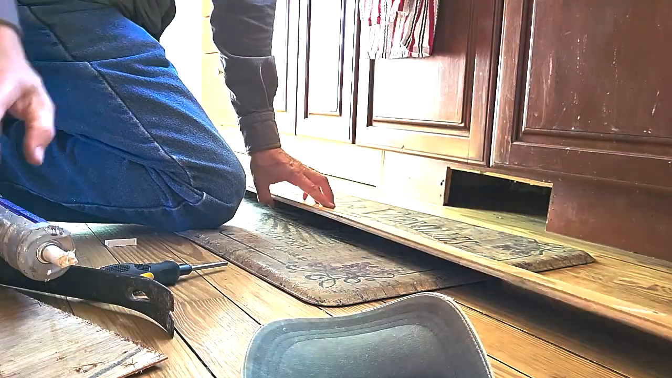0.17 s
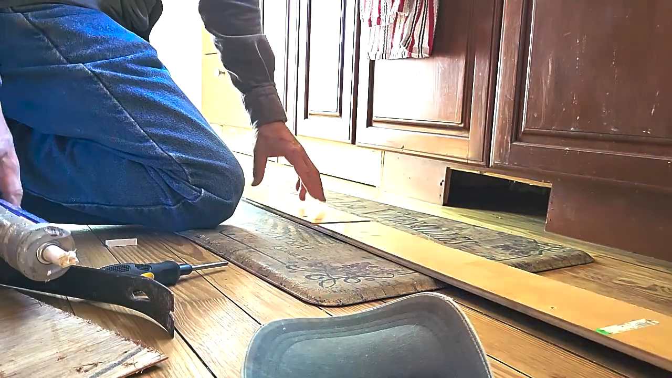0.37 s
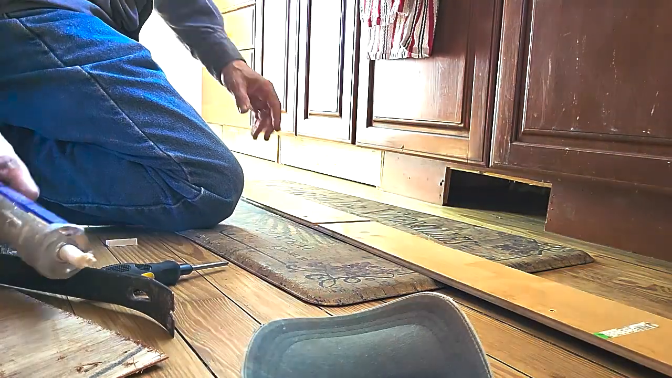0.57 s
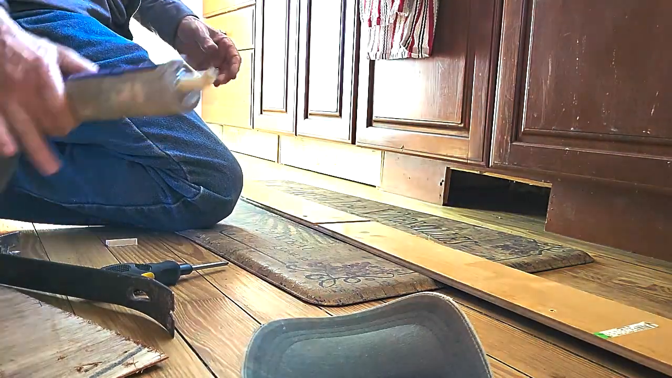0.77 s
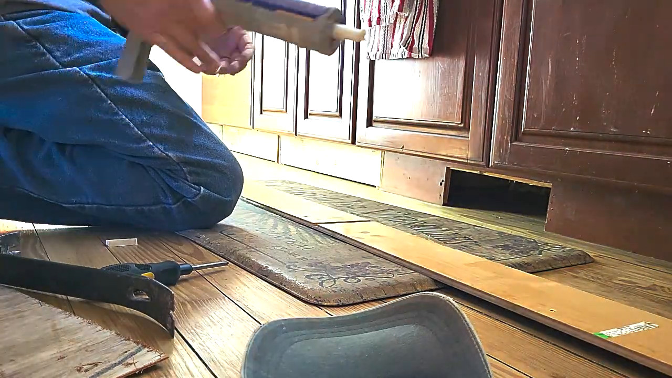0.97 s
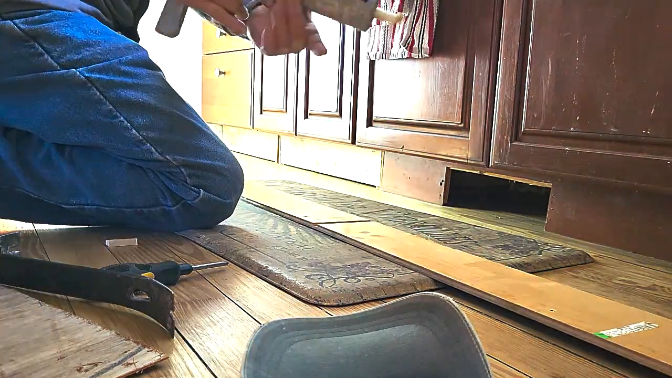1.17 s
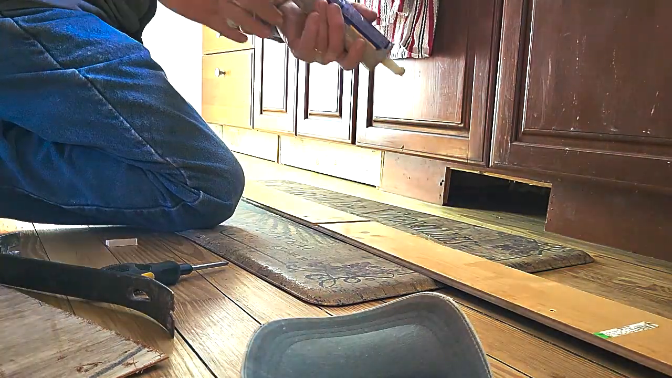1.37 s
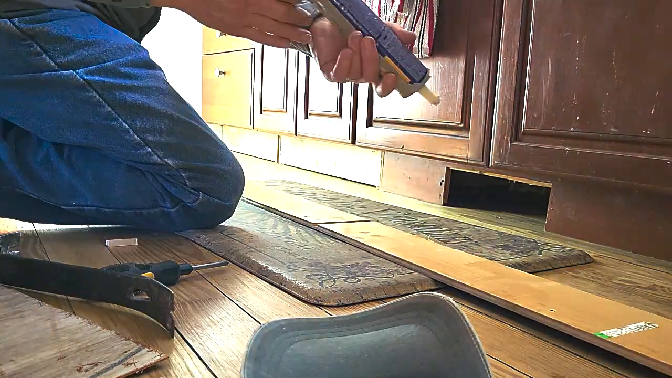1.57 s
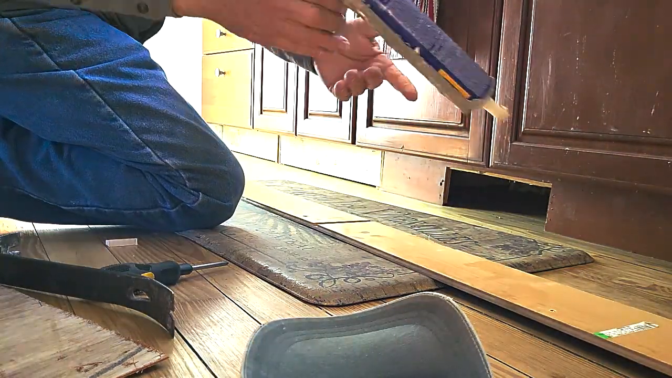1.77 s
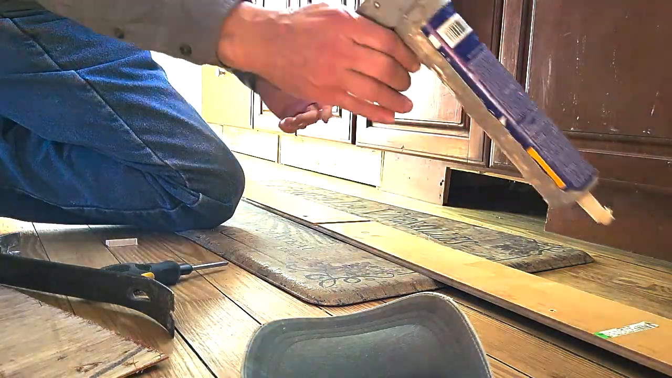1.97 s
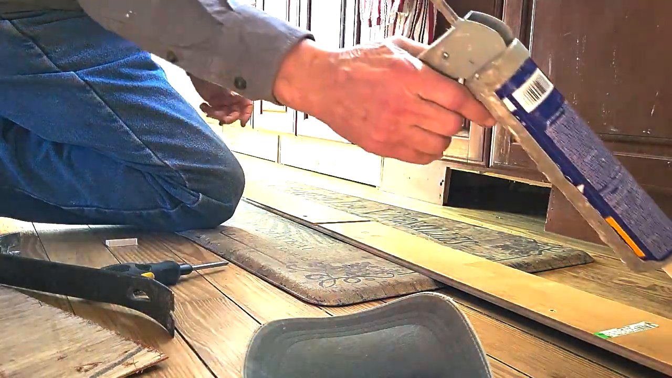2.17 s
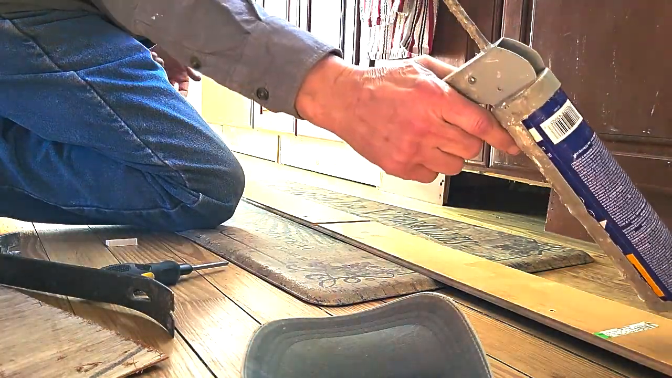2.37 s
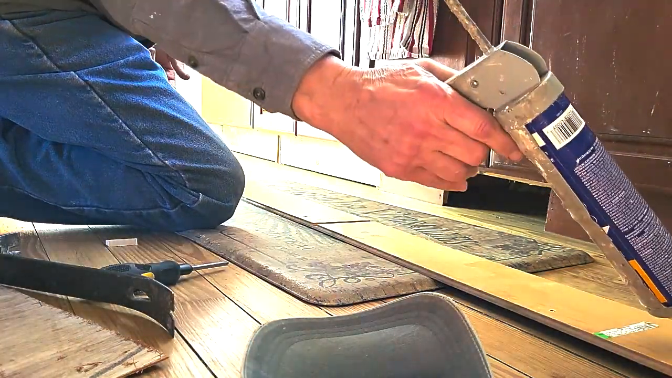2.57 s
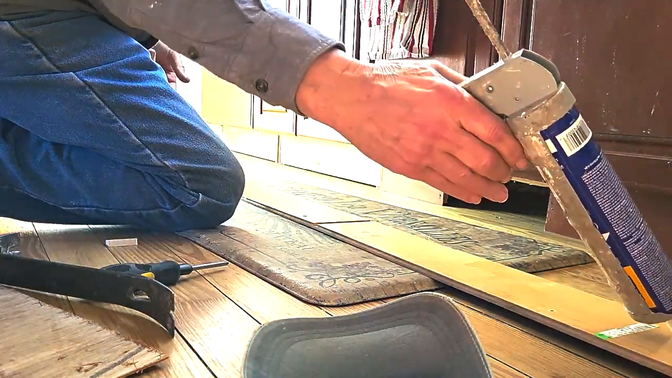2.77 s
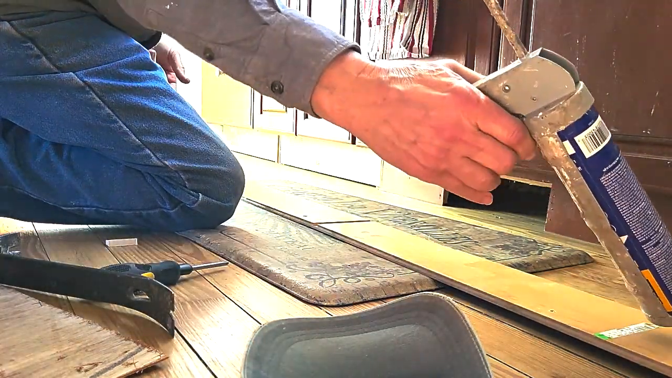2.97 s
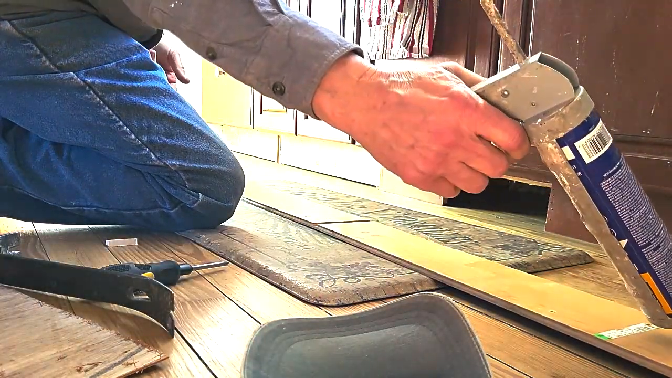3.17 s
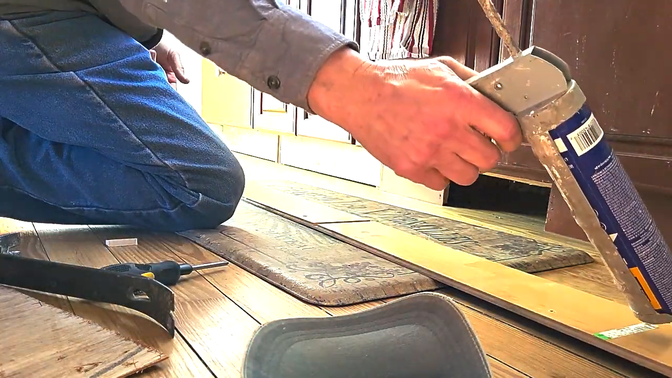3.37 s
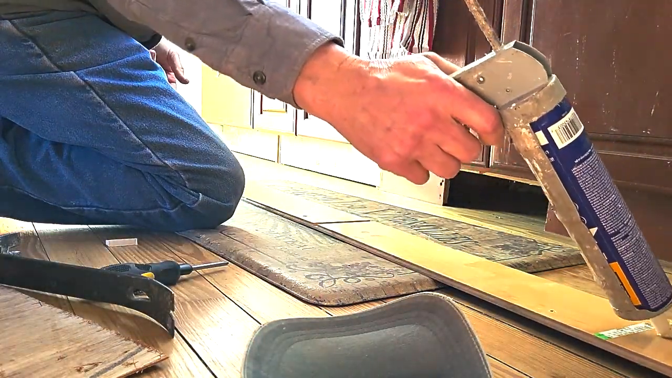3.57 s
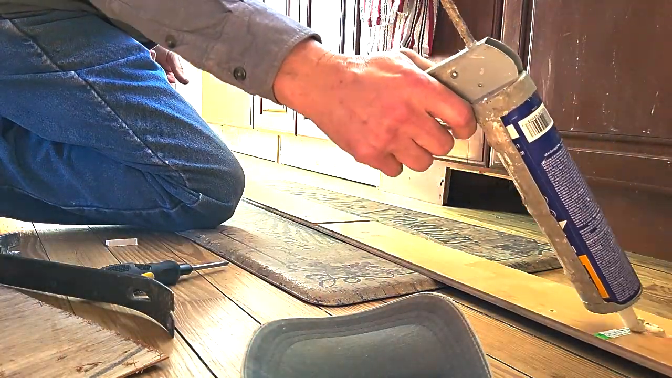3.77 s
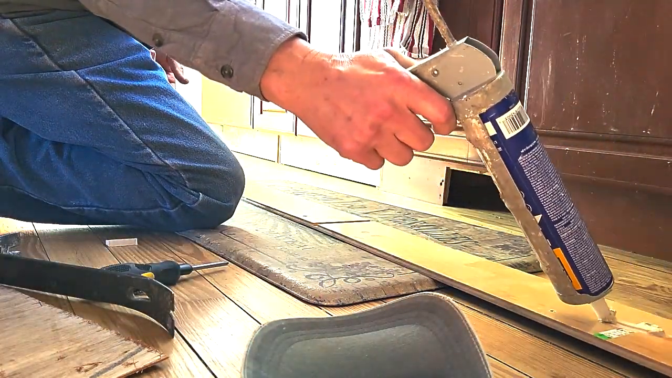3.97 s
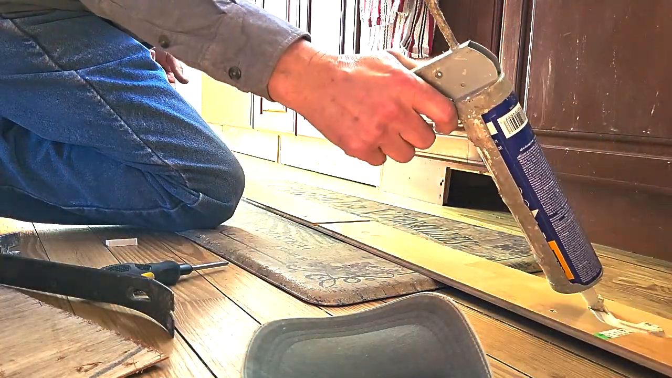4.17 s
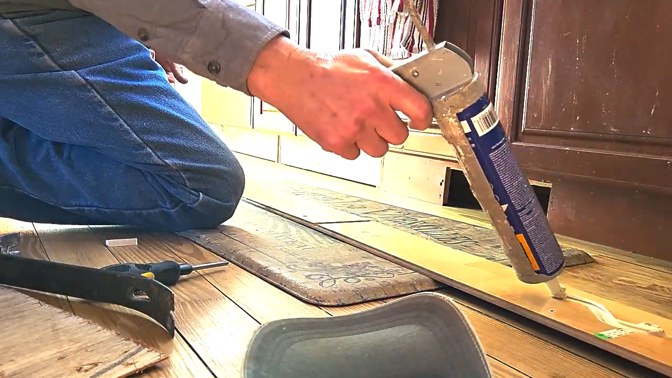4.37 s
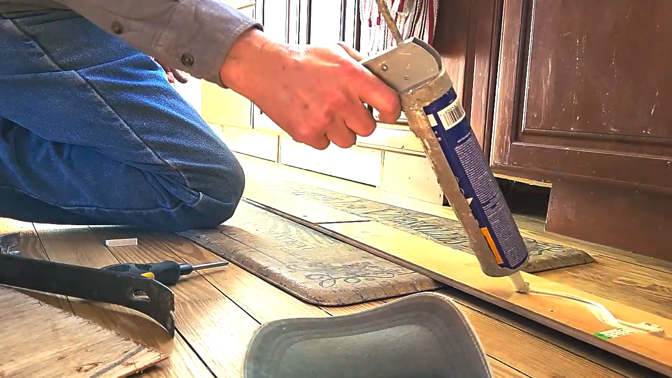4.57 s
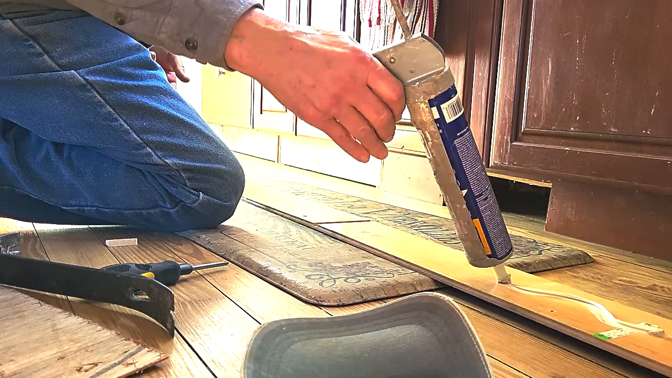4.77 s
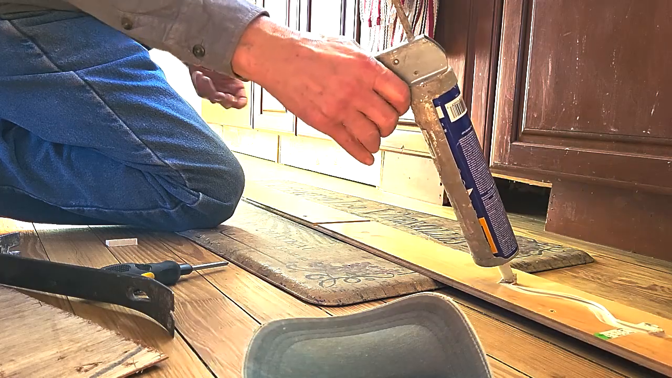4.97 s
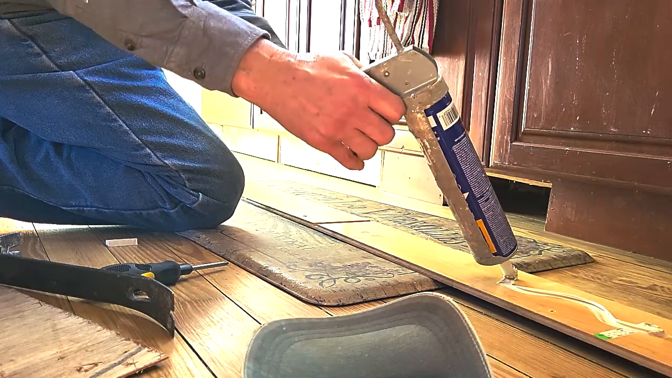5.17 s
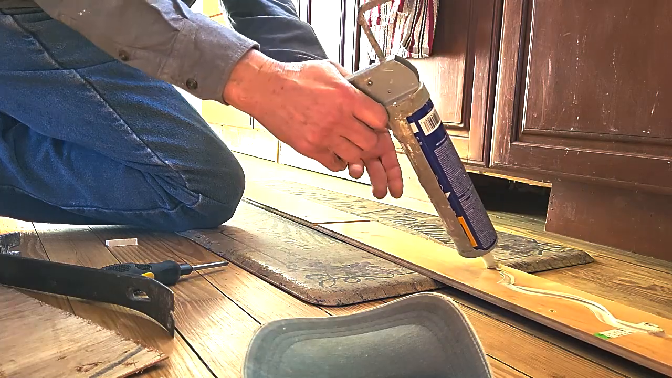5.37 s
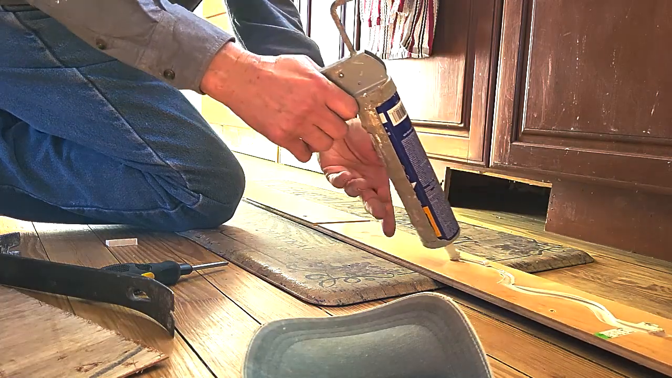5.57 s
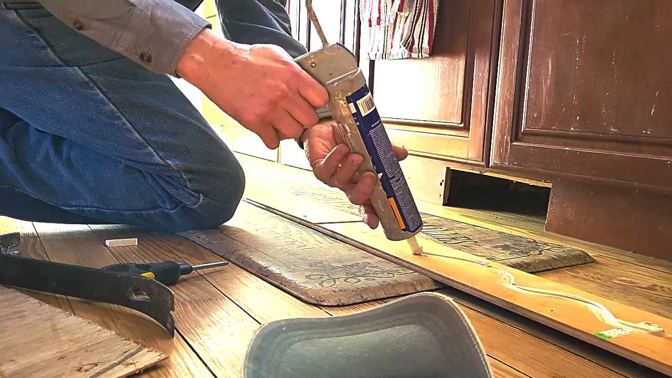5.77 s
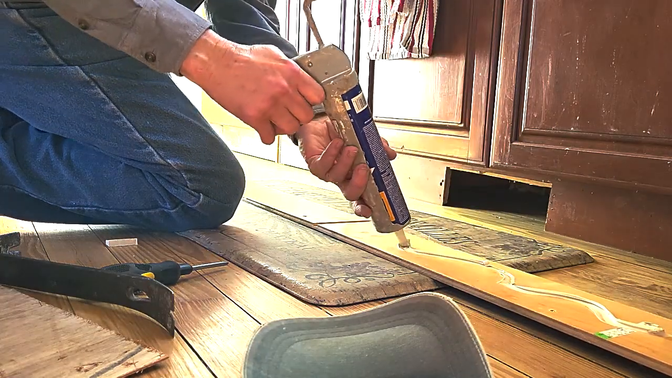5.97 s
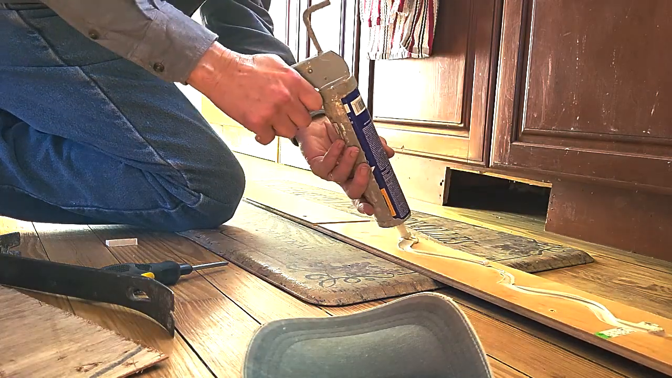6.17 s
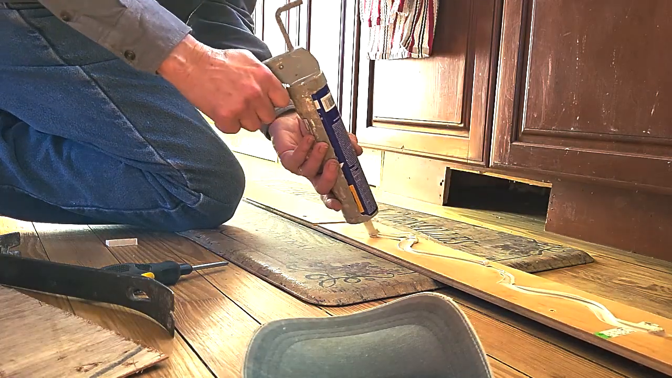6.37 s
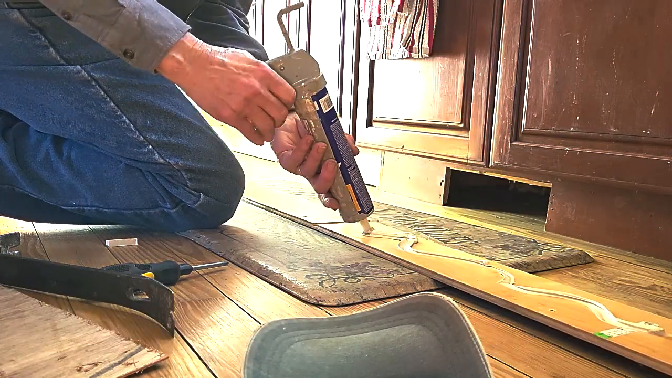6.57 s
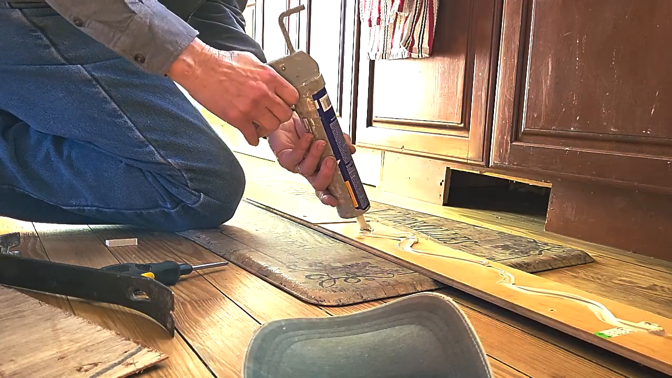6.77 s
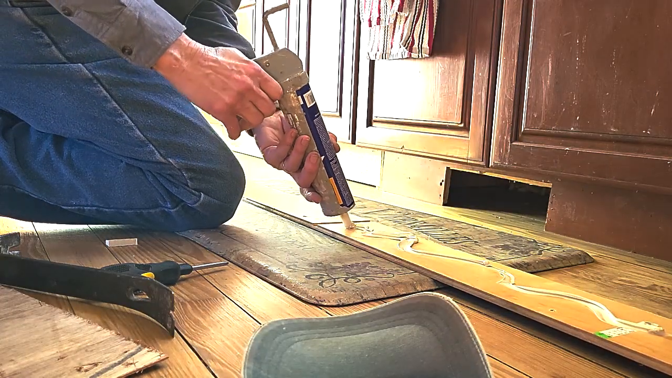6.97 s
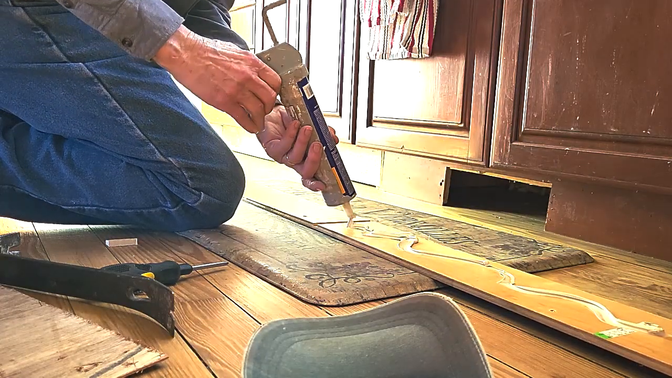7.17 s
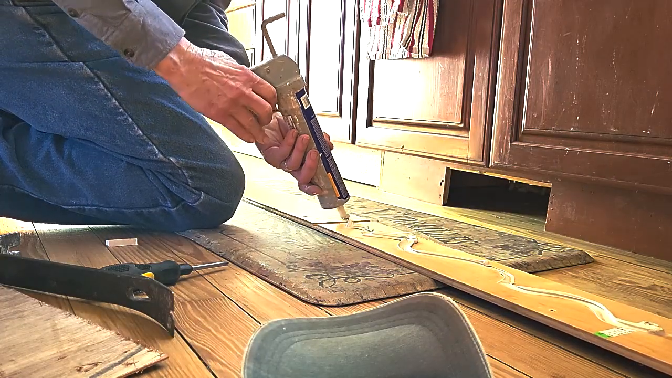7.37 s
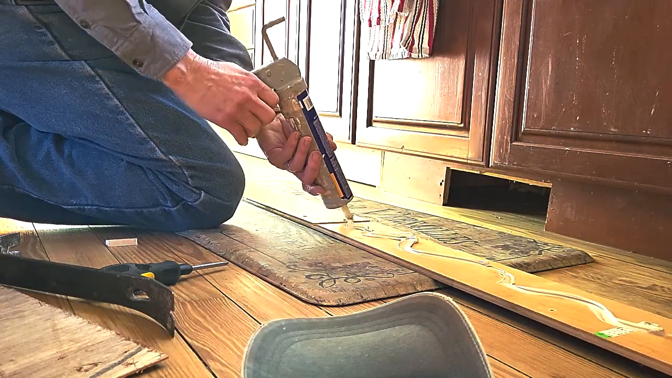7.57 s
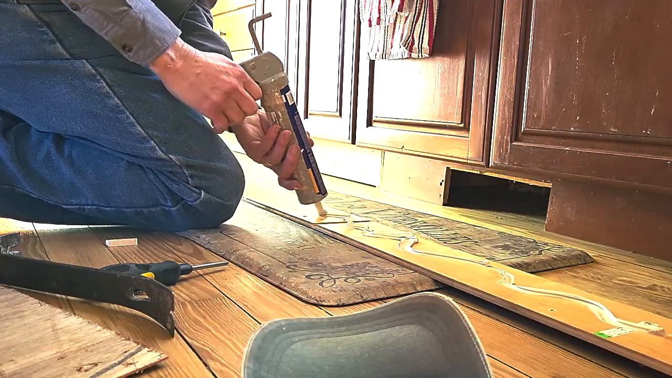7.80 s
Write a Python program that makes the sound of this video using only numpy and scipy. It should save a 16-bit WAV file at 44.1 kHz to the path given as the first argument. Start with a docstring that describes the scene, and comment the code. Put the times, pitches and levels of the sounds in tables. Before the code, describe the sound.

A wooden panel knocks and slaps flat onto the floor, then a metal caulking gun clicks, rattles and faintly creaks in a lively room.

```python
"""Kitchen: a wooden panel knocks and slaps onto the floor; a steel caulking gun is picked up and squeezed along it.
Noise cracks and decaying modes form the panel's blows and the gun's clicks; narrow noise bands tink and creak.
The cartridge bumps on damped sines; shaped noise gives sleeves, palm and two pops of air at the nozzle.
Decaying noise echoes answer all but the pops, over a low rumble, floor sway and mains hum."""
import sys
import numpy as np
from scipy import signal
from scipy.fft import rfft, irfft
from scipy.io import wavfile
from scipy.ndimage import uniform_filter1d

SR = 44100
rng = np.random.default_rng(int(sys.argv[2]) if len(sys.argv) > 2 else 0)


def int16_out(signal):
    """Quantize to a 16-bit WAV file."""
    q = np.round(np.clip(np.atleast_2d(signal).T, -1, 1) * 32767)
    wavfile.write(sys.argv[1], SR, q.astype(np.int16))


N = 345511
TIME_S = np.arange(N) / SR
AGE_S = np.arange(SR) / SR  # time since a blow

# house rumble spectrum: (frequency [Hz], density [dB per Hz])
RUMBLE_COLOUR = [(20, -3.5), (58, -8), (120, -5.5), (190, -8.5), (310, -15), (660, -28), (1000, -27.5),
                 (1330, -35.5), (2200, -37.5), (2900, -52), (7500, -42.5), (9000, -47.5), (12500, -49.5),
                 (14500, -63.5)]
RUMBLE_DB = -56.5
# mains hum: (frequency [Hz], mean level [dB])
HUM_PARTIALS = [(59.6, -65.5), (119.3, -60), (180, -67.5), (240, -71.5)]
# floor sways as weight shifts: (middle [s], length [s], peak level [dB])
SWAY_STROKES = [(.05, .28, -38), (.5, 0.36, -47.5), (2.5, 0.65, -59)]
# sway spectrum: (frequency [Hz], density [dB per Hz])
SWAY_COLOUR = [(20, 6.5), (45, 5), (110, 7.5), (200, -13.5), (500, -11.5), (1500, -52)]

# sleeve strokes: (middle [s], length [s], relative level [dB])
SLEEVE_STROKES = [(.07, 0.18, -47.5), (.29, 0.082, -53.5), (.58, 0.38, -68), (.99, .14, -58.5),
                  (1.135, 0.041, -56.5), (2.2, 0.35, -65.5), (2.55, 0.06, -59), (3.05, 0.19, -69.5),
                  (4.31, 0.089, -68), (5.15, .55, -74), (5.97, 0.24, -70.5), (6.4, 0.068, -62),
                  (7.1, 0.3, -76.5)]
# palm strokes along the cartridge: (middle [s], length [s], relative level [dB])
PALM_STROKES = [(1.26, 0.1, -44.5), (1.53, 0.18, -63.5), (1.68, 0.13, -51)]
# cloth and skin spectra: (frequency [Hz], density [dB per Hz])
CLOTH_COLOUR = [(300, -12.5), (1000, -11.5), (2200, 5), (3500, 4.5), (7300, 4.5), (9000, -14), (11000, -14),
                (15000, -9.5)]
SKIN_COLOUR = [(1000, -20), (3000, -0.5), (7300, -0.5), (9000, -10), (11000, -12.5), (15500, -5)]
RUSTLE_REL_DB = -75.5  # the clothes are never quite still

# edge knocks on panel and floor: (time [s], clack level [dB], relative thud level [dB])
PANEL_KNOCKS = [(0.015, -40, -36), (0.055, -50.5, -36.5), (0.1158, -32.5, -30.5), (.140, -38.5, -35),
                (0.179, -49, -38.5), (0.332, -60.5, -31.5), (0.345, -57, -28.5), (1.198, -62, -39),
                (2.179, -83, -48), (2.763, -74, -39)]
# panel modes: (nominal frequency [Hz], relative level [dB], t60 [s])
PANEL_MODES = [(709.6, -2.5, 0.32), (928, -5, 0.12), (1189, -4.5, 0.23), (1213, 5.5, 0.36),
               (1630, -14.5, .25), (1910, -2, 0.22), (2070, -4, 0.15), (2370, -17.5, 0.38),
               (2520, -5, 0.47), (2690, -2.5, 0.233), (2730, -7.5, .25), (3130, -18.5, 0.1)]
# panel crack/chatter and floor thud spectra: (frequency [Hz], density [dB per Hz])
CLACK_COLOUR = [(120, -16), (250, -1.5), (600, 7), (1200, 3.5), (2200, 5), (3100, -5), (3900, -1),
                (5000, -4), (7200, -14), (9000, -28.5), (15000, -47.5)]
THUD_COLOUR = [(20, -21), (50, -14), (85, 5), (130, -4.5), (250, -1.5), (400, -14), (900, -32.5),
               (2500, -73.5)]
BOOM_HZ = 240  # panel's lowest mode
KNOCK_TILT_DB_PER_OCT, SLAP_TILT_DB_PER_OCT = -11.5, 7.2
SLAP_S, SLAP_DB, SLAP_THUD_REL_DB = 0.3609, -25, -23  # panel falls flat
REBOUND_S, REBOUND_GAP_S = 0.372, 0.027  # first rebound, spacing
REBOUND_DB, REBOUND_THUD_REL_DB, REBOUND_LOSS_DB = -30.5, -26.5, 6.5  # first rebound, loss per rebound

# room response bands: (centre [Hz], t60 [s], level [dB])
ROOM_BANDS = [(80, 0.52, -8), (288, 0.66, -11.5), (1003, 0.55, -3.5), (2160, 0.52, -6), (4070, 0.47, -8.5),
              (7500, .4, -12.5), (11000, .3, -9), (15180, 0.23, -12)]

# hollow cartridge bumps in the cradle: (time [s], relative level [dB], pitch [Hz])
CARTRIDGE_BUMPS = [(0.565, -41, 336), (1.2, -41.5, 379), (1.244, -44, 334), (1.712, -38, 359),
                   (2.059, -51, 334), (2.172, -46.5, 308), (2.231, -46.5, 352), (2.268, -52, 326),
                   (2.56, -45, 361), (2.59, -42.5, 352), (2.689, -40.5, 340), (3.012, -47.5, 327),
                   (4.761, -32.5, 304), (6.563, -43, 340)]
# cartridge rub and wall knock spectra: (frequency [Hz], density [dB per Hz])
RUB_COLOUR = [(100, -16), (230, 0.5), (350, 13.5), (600, -10.0), (1200, -39.5)]
WALL_COLOUR = [(400, -19.5), (590, 3.5), (690, -6.5), (820, -2.5), (1100, -8), (1600, -27.5)]
WALL_T60_S = 0.06

# gun pick-up, slack pumps, catch-plate snaps, trigger bounces, light touches:
# (time [s], relative click level [dB], relative frame level [dB], tilt [dB per octave],
#  struck-part pitch [Hz], left minus right [dB])
GUN_CLICKS = [ (1.197, -54.5, -62, -5, 2520, -6), (1.211, -48, -50, -9, 3800, 1),
              (1.244, -35.5, -44, -6, 2500, -1.5), (1.278, -29, -41.5, -10.5, 3480, -2.5),
              (1.712, -53, -55.5, -17, 2200, -2), (1.833, -59, -50.5, -5, 1850, -1),
              (2.051, -50.5, -49.5, -15, 2150, -4), (2.156, -60, -60, -3, 2520, -5),
              (2.2302, -32, -42, -0.5, 5460, -2), (2.43, -39, -40, 0, 7000, -2),
              (2.574, -39.5, -40.5, -1, 5600, -4), (2.592, -42, -39, -8.5, 5300, -6),
              (2.6825, -29, -36, -7, 4400, -5), (2.826, -53, -54, -8.5, 3000, -2.5),
              (2.936, -59, -47.5, -12.5, 2660, -4), (3.2023, -28.5, -41, 2.5, 7870, -5),
              (4.39, -42, -44.5, -7.5, 7250, -1), (4.5358, -23.5, -49.5, 3, 7900, -3.5),
              (4.7101, -29, -32, -1, 2250, -2.5), (4.7333, -25.5, -27, -6, 7200, -7),
              (4.7429, -29.5, -29, -9, 2380, -2), (4.7498, -23.5, -42.5, -3, 2400, -5.5),
              (4.7598, -40.5, -28, -3, 2380, -2.5), (6.138, -54.5, -65, -8, 5000, -2.5),
              (6.262, -68.5, -83.5, -2.5, 7740, -2), (6.294, -66.5, -84, -3.5, 7700, -5),
              (6.516, -37, -42.5, -0.5, 2100, -2.5), (6.5475, -25, -28.5, -2.5, 2250, -2),
              (6.565, -27.5, -48, -3.5, 2230, -5.5), (7.076, -54, -52, -14.5, 2180, -5),
              (7.101, -59, -73, -10, 2390, -2), (7.148, -61.5, -56, -19, 2170, 0),
              (7.427, -47.5, -60, -23, 2385, -3)]
# gun frame and small steel parts: (nominal frequency [Hz], relative level [dB], t60 [s])
FRAME_MODES = [(1836, -8.5, 0.042), (1970, -3.5, 0.049), (2183, -1, 0.038), (2224, -12, 0.034),
               (2608, 2.5, 0.013)]
PART_MODES = [(2760, -1.5, 0.0097), (3570, -10.5, 0.028), (3955, -1.5, 0.038), (4160, -10.5, 0.06),
              (4335, 6.5, 0.032), (4770, -9, 0.085), (5000, -7.5, 0.051), (6080, -3, 0.056),
              (6430, 2.5, 0.0093), (7410, -4.5, 0.055), (8170, -7, 0.09), (9200, -16.5, 0.01)]
# spring's two slowest modes: (nominal frequency [Hz], relative level [dB], t60 [s])
SPRING_MODES = [(1847, 2.5, 1.3), (2280, -3, 1.5)]
# spectra of steel crack, edge chink, spring's close modes, cartridge rattle: (frequency [Hz], density [dB per Hz])
STEEL_COLOUR = [(900, -21), (1500, -27.5), (2000, -2), (3200, -2.5), (4400, 0.5), (5600, -1), (7400, 5),
                (8200, -3), (9000, -4.5), (11000, -11), (13000, -8.5), (15500, -14.5)]
CHINK_COLOUR = [(7000, -38.5), (11000, -14), (12500, -4), (14300, 2.5), (15700, -2.5), (17000, -16)]
SPRING_COLOUR = [(1300, -36.5), (1750, 2), (2000, -9), (2350, -1.5), (2700, -12), (3600, -39)]
RATTLE_COLOUR = [(150, -0.5), (350, -7), (700, -4.5), (1200, -2.5), (1700, 4), (2600, -25.5), (5000, -41.5)]
# cartridge play, mostly less once the rod has seated it: (time [s], rattle relative to blow [dB])
CARTRIDGE_PLAY = [(1.2, -1.5), (1.85, 1.5), (2.05, -17.5), (2.6, -12), (3.2, -24), (4.7, -20.5), (6.5, -18)]

# rod slips under the squeezed trigger: (time [s], relative level [dB])
ROD_SLIPS = [(2.985, -61), (3.106, -66), (4.104, -62), (4.227, -68.5), (4.29, -57), (6.311, -58.5),
             (6.418, -58.5)]
CREAK_HZ, CREAK_T60_S = 1975, 0.22  # frame's singing mode
SLIP_HZ, SLIP_T60_S = 1850, 0.035  # lower chirp at slip onset

# air pockets popping at the nozzle: (time [s], burst level [dB], nominal ring [Hz])
AIR_POPS = [(3.782, -55.5, 2290), (3.911, -63, 2470)]
# pop spectrum: (frequency [Hz], density [dB per Hz])
POP_COLOUR = [(300, -27), (700, 15), (1200, -17), (2200, 7), (2800, -13), (4000, -45)]

TOP_HZ = 15800


def undb(db):
    """Decibels to gain."""
    return 10 ** (np.asarray(db) / 20)


def unit(x):
    """Scale to rms 1."""
    return x / np.sqrt(np.mean(x ** 2))


def blow(x, db):
    """Set a blow's level by the rms of its first 10 ms in each channel."""
    head = x[:, :441]
    return undb(db) * x / np.sqrt(np.mean(head ** 2, axis=1, keepdims=True))


def along(table, at):
    """Interpolate a two-column table linearly."""
    return np.interp(at, *np.transpose(table))


def fade(t60_s):
    """Exponential decay, 60 dB in t60."""
    return np.exp(-np.log(1000) * AGE_S / max(t60_s, 0.002))


def rise(seconds):
    """Exponential build-up of contact force."""
    return 1 - np.exp(-AGE_S / max(seconds, 1e-5))


def slope(hz, tilt):
    """Tilt [dB per octave] above 3 kHz: harder contacts lift the treble, softer ones lose it."""
    return tilt * np.log2(np.maximum(hz, 3000) / 3000)


def noise(colour, size, tilt=0, alike_hz=600, alike=0.025):
    """Coloured stereo noise, rms 1; the channels are nearly alike in the bass."""
    hz = np.maximum(np.fft.rfftfreq(size, 1 / SR), 1)
    table_hz, table_db = np.transpose(colour)
    colour_db = np.interp(np.log(hz), np.log(table_hz), table_db)
    gain = undb(colour_db + slope(hz, tilt))
    likeness = np.clip(alike + (1 - alike) / (1 + (hz / alike_hz) ** 2), 0, 0.99)
    white = rfft(rng.standard_normal((2, size)))
    mid, side = white * gain * np.sqrt([1 + likeness, 1 - likeness])
    return unit(irfft(np.array([mid + side, mid - side]), size))


def ring(modes, tilt=0, scatter_db=3, detune=0.0043):
    """Decaying modes; each blow lands elsewhere and so weights and detunes them anew."""
    out = 0
    for hz, db, t60_s in modes:
        size, shift, phase, lag = rng.standard_normal(4)
        channel_lag = np.array([[0], [lag]]) * min(hz / 1500, np.pi)
        turn = 2 * np.pi * hz * (1 + detune * shift) * AGE_S
        wave = np.sin(turn + np.pi * phase + channel_lag)
        out = out + undb(db + slope(hz, tilt) + scatter_db * size) * fade(t60_s) * wave
    return out


def cluster(hz, width, t60_s):
    """Narrow noise band: close modes that beat roughly as they die; width is a share of the pitch."""
    skirt = np.exp(abs(width))
    band = [(hz / skirt ** 4, -60), (hz / skirt, -12), (hz, 0), (hz * skirt, -12), (hz * skirt ** 4, -60)]
    return noise(band, SR) * fade(t60_s)


def swells(strokes):
    """Sum of bell-shaped movements; length is the width at half height."""
    return sum(undb(db) * 0.5 ** ((2 * (TIME_S - s) / length_s) ** 2) for s, length_s, db in strokes)


def lead_in(colour, db, t60_s, tilt=0):
    """Surfaces scrape before they meet fully: 16 ms of reversed decay, swelling towards the blow."""
    decay = blow(noise(colour, SR, tilt) * fade(t60_s), db)
    return decay[:, 705::-1]


def add(track, s, sound, pan_db=0):
    """Mix in at a time; pan is left minus right."""
    start = max(int(s * SR), 0)
    part = sound[:, :N - start]
    sides = unit(undb(np.array([[pan_db], [-pan_db]]) / 2))
    track[:, start:start + part.shape[1]] += part * sides


def background(waver_db=2):
    """House rumble, mains hum with partials wavering separately, and the floor's sway."""
    hum = 0
    for hz, db in HUM_PARTIALS:
        waver = np.interp(TIME_S, np.linspace(0, TIME_S[-1], 32), rng.standard_normal(32))
        sine = np.sin(2 * np.pi * (hz * TIME_S + rng.random()))
        hum = hum + np.sqrt(2) * undb(db + waver_db * waver) * sine
    sway = noise(SWAY_COLOUR, N) * swells(SWAY_STROKES)
    rumble = noise(RUMBLE_COLOUR, N, alike_hz=690) * undb(RUMBLE_DB)
    return rumble + hum + sway


def sleeves(grain_db=1.5, pan_db=-1, level_db=-5):
    """Cloth and skin slide in uneven little catches: noise under movement bells and a random grain."""
    out = np.zeros((2, N))
    cloth_motion = swells(SLEEVE_STROKES) + undb(RUSTLE_REL_DB)
    for colour, motion in ((CLOTH_COLOUR, cloth_motion), (SKIN_COLOUR, swells(PALM_STROKES))):
        grain = unit(uniform_filter1d(rng.standard_normal(N), size=400))  # 9 ms mean
        add(out, 0, noise(colour, N) * motion * undb(level_db + grain_db * grain), pan_db)
    return out


def panel_blows(count=4, edge_db=2, slap_edge_db=0.5, rebound_edge_db=-11):
    """Edge knocks, flat slap, dying rebounds: (time [s], clack, edge tap, thud [dB], tilt [dB per octave])."""
    blows = [(s, db, db + edge_db, thud_db, KNOCK_TILT_DB_PER_OCT) for s, db, thud_db in PANEL_KNOCKS]
    blows.append((SLAP_S, SLAP_DB, SLAP_DB + slap_edge_db, SLAP_THUD_REL_DB, SLAP_TILT_DB_PER_OCT))
    for k in range(count):
        s = REBOUND_S + k * REBOUND_GAP_S
        db = REBOUND_DB - k * REBOUND_LOSS_DB
        thud_db = REBOUND_THUD_REL_DB - k * REBOUND_LOSS_DB
        blows.append((s, db, db + rebound_edge_db, thud_db, SLAP_TILT_DB_PER_OCT))
    return blows


def panel(crack_t60_s=0.017, chatter_db=-11.5, chatter_t60_s=0.38, modes_db=-13.0, thud_t60_s=0.12,
          pan_db=-2, scrape_db=-17, boom_db=-7, boom_t60_s=0.33):
    """Wood on floor: scrape, crack, thin-edge tap, chatter along the board, its modes and boom, floor thud."""
    out = np.zeros((2, N))
    for s, clack_db, edge_db, thud_db, tilt in panel_blows():
        crack = noise(CLACK_COLOUR, SR, tilt, alike_hz=350) * fade(crack_t60_s) * rise(0.0013)
        crack = blow(crack, clack_db)
        edge = blow(cluster(2850, 0.17, 0.033) * rise(0.00029), edge_db)
        chatter = noise(CLACK_COLOUR, SR, tilt, alike_hz=350) * fade(chatter_t60_s) * rise(0.01)
        chatter = blow(chatter, clack_db + chatter_db)
        modes = ring(PANEL_MODES, scatter_db=2, detune=0.001)
        board = blow(modes * rise(0.0013), clack_db + modes_db)
        boom_wave = np.sin(2 * np.pi * (BOOM_HZ * AGE_S + rng.random()))
        boom = undb(clack_db + boom_db) * boom_wave * fade(boom_t60_s)
        thud = undb(thud_db) * noise(THUD_COLOUR, SR) * fade(thud_t60_s) * rise(0.0011)
        scrape = lead_in(CLACK_COLOUR, clack_db + scrape_db, 0.032, tilt)
        add(out, s - scrape.shape[1] / SR, scrape, pan_db)
        add(out, s, crack + edge + chatter + board, pan_db)
        add(out, s, thud + boom, pan_db=0.5)
    return out


def room(near, gap_s=0.0069, build_s=0.0062):
    """Dense echoes from cabinets and walls: noise bands, each dying at its own rate."""
    hz = np.maximum(np.fft.rfftfreq(SR, 1 / SR), 1)
    centres = np.log([row[0] for row in ROOM_BANDS])
    echoes = rfft(noise([(20, 0), (20000, 0)], SR))
    onset = 1 - np.exp(-np.maximum(AGE_S - gap_s, 0) / build_s)
    response = 0
    # one-hot rows make overlapping triangular bands
    for share, (_, t60_s, db) in zip(np.eye(len(ROOM_BANDS)), ROOM_BANDS):
        envelope = fade(t60_s) * onset
        band = irfft(echoes * np.interp(np.log(hz), centres, share), SR)
        response = response + undb(db) * band * envelope / np.linalg.norm(envelope)
    mixed = 0.99 * near + 0.18 * near[::-1]  # walls mix the sides
    return signal.fftconvolve(mixed, response, axes=1)[:, :N]


def cartridge(pan_db=2, rub_db=-9, t60_s=0.071, note_db=-4, wall_db=-14):
    """The tube bumps in its cradle: a damped hollow note, a higher wall knock and a dull rub."""
    out = np.zeros((2, N))
    for s, db, hz in CARTRIDGE_BUMPS:
        note = np.sqrt(2) * np.sin(2 * np.pi * hz * AGE_S)
        rub = undb(rub_db) * noise(RUB_COLOUR, SR, alike_hz=350)
        body = blow((note + rub) * fade(t60_s) * rise(0.014), db + note_db)
        wall = blow(noise(WALL_COLOUR, SR) * fade(WALL_T60_S) * rise(0.00064), db + wall_db)
        add(out, s, body + wall, pan_db)
    return out


def gun(click_t60_s=0.05, parts_db=-10, crack_db=-1.0, frame_db=-3.0, spring_db=-28, spring_t60_s=1.0,
        rattle_t60_s=0.11, chink_t60_s=0.025, scrape_db=-15, scrape_t60_s=0.091, chink_db=-11,
        chink_per_tilt=0.63, sing_db=-33):
    """Steel scrapes, then strikes steel: crack, bright modes, frame ring, faint spring, cartridge rattle."""
    out = np.zeros((2, N))
    for s, click_db, ring_db, tilt, _, pan_db in GUN_CLICKS:
        crack = noise(STEEL_COLOUR, SR, tilt, alike=0.027) * fade(click_t60_s) * rise(0.00058)
        crack = blow(crack, click_db + crack_db)
        # the harder the contact, the more its edge chinks
        chink = noise(CHINK_COLOUR, SR, alike=0.05) * fade(chink_t60_s) * rise(0.0003)
        chink = blow(chink, click_db + chink_db + chink_per_tilt * tilt)
        parts = blow(ring(PART_MODES, tilt, detune=0.025) * rise(0.0009), click_db + parts_db)
        frame = blow(ring(FRAME_MODES, detune=0.023) * rise(0.0017), ring_db + frame_db)
        spring = blow(noise(SPRING_COLOUR, SR) * fade(spring_t60_s), ring_db + spring_db)
        sing = blow(ring(SPRING_MODES), ring_db + sing_db)
        rattle = noise(RATTLE_COLOUR, SR, alike_hz=350) * fade(rattle_t60_s) * rise(0.00049)
        rattle = blow(rattle, (click_db + ring_db) / 2 + along(CARTRIDGE_PLAY, s))
        add(out, s, crack + chink + parts + frame + spring + sing + rattle, pan_db)
        # a clean snap barely moves the frame and has little scrape
        snap_db = max(click_db - ring_db, 0)
        scrape = lead_in(STEEL_COLOUR, ring_db - snap_db + scrape_db, scrape_t60_s, tilt)
        add(out, s - scrape.shape[1] / SR, scrape, pan_db)
    return out


def tinks(tink_db=-16, growth=0.77, width=0.045, t60_s=0.09, linger_db=-13, linger_t60_s=0.18, pan_db=-5):
    """Struck parts tink and linger; level grows slower than the crack, so light touches are most tonal."""
    out = np.zeros((2, N))
    for s, click_db, _, _, hz, _ in GUN_CLICKS:
        linger = undb(linger_db) * cluster(hz, width / 2, linger_t60_s)
        tink = cluster(hz, width, t60_s) + linger
        add(out, s, blow(tink * rise(0.00073), tink_db + growth * click_db), pan_db)
    return out


def creak(width=0.065, build_s=0.008, slip_db=-1, pan_db=1):
    """Each slip of the rod chirps and sets the frame's main mode singing raggedly."""
    out = np.zeros((2, N))
    for s, db in ROD_SLIPS:
        slip = undb(slip_db) * cluster(SLIP_HZ, width, SLIP_T60_S) * rise(0.00055)
        song = cluster(CREAK_HZ, width, CREAK_T60_S) * rise(build_s)
        add(out, s, undb(db) * (slip + song), pan_db)
    return out


def nozzle(ring_db=-7, ring_t60_s=0.049):
    """Trapped air bursts out of the adhesive and briefly rings the nozzle."""
    out = np.zeros((2, N))
    for s, db, hz in AIR_POPS:
        burst = blow(noise(POP_COLOUR, SR) * fade(0.028), db)
        tone = blow(ring([(hz, 0, ring_t60_s)]), db + ring_db)
        add(out, s, burst + tone)
    return out


def scene():
    """Panel, gun, cartridge and sleeves in the room; pops and background without it."""
    near = sleeves() + panel() + cartridge() + gun() + tinks() + creak()
    return near + room(near) + nozzle() + background()


def record(dry):
    """Elliptic low-pass: the top is cut steeply."""
    low_pass = signal.ellip(10, 0.2, 70, TOP_HZ, fs=SR, output="sos")
    return signal.sosfilt(low_pass, dry)


dry = scene()
out = record(dry)
int16_out(out)
```